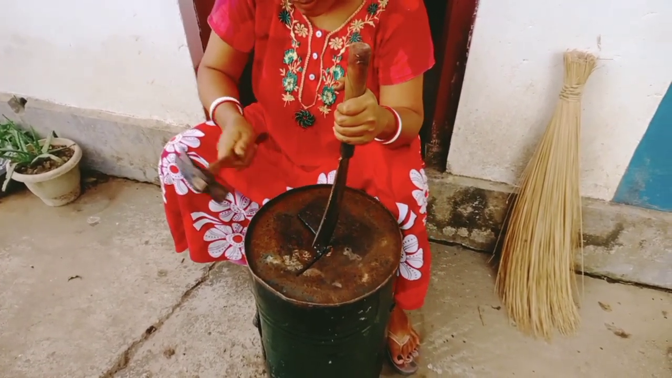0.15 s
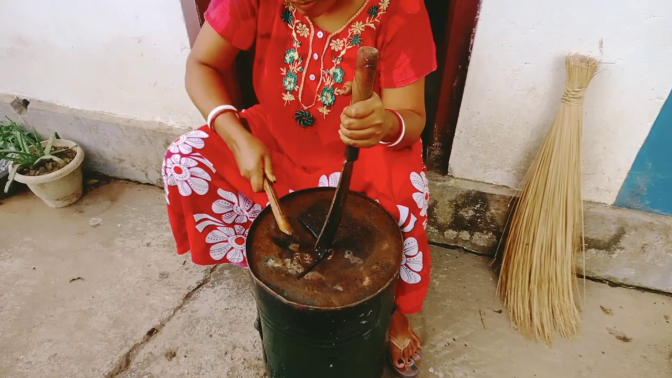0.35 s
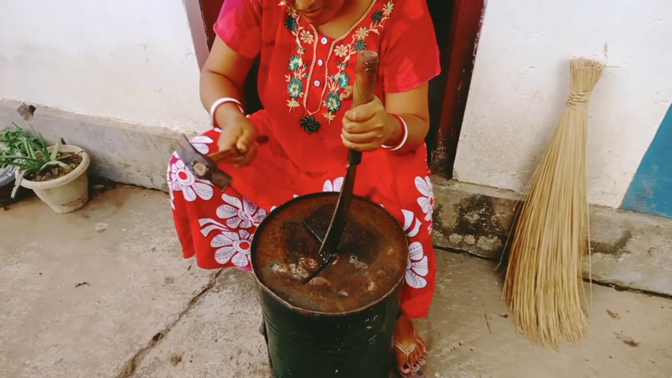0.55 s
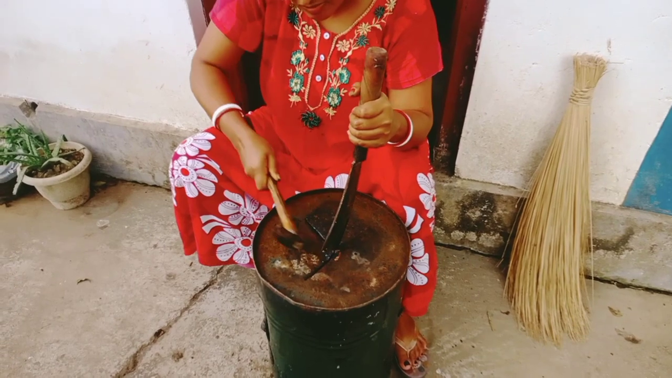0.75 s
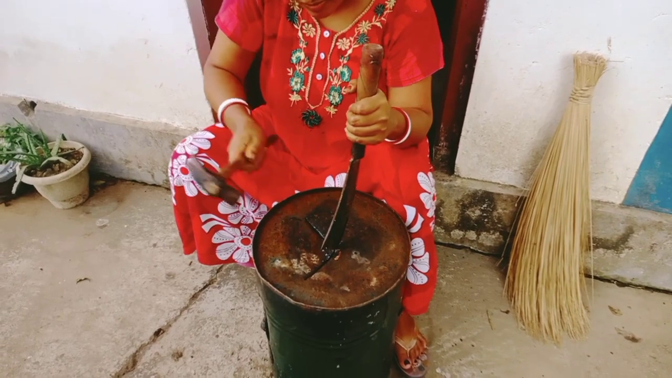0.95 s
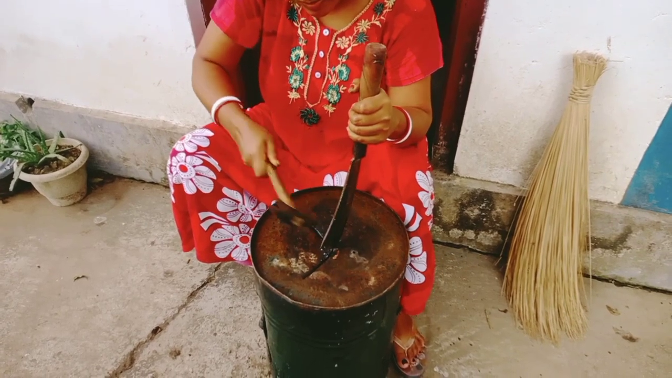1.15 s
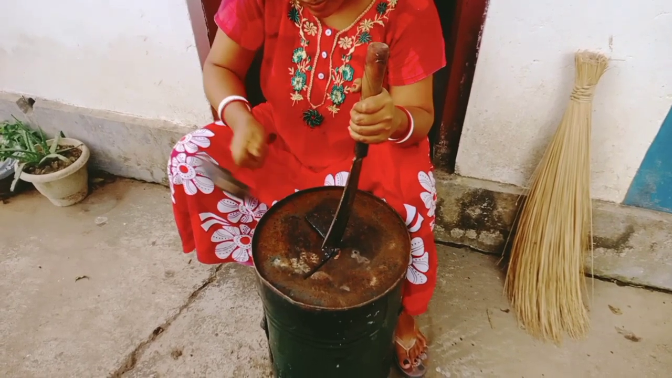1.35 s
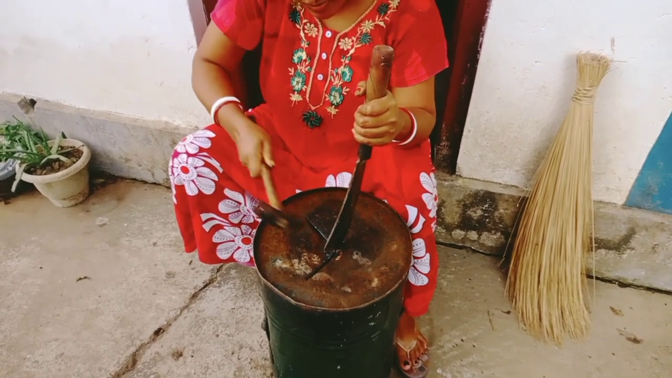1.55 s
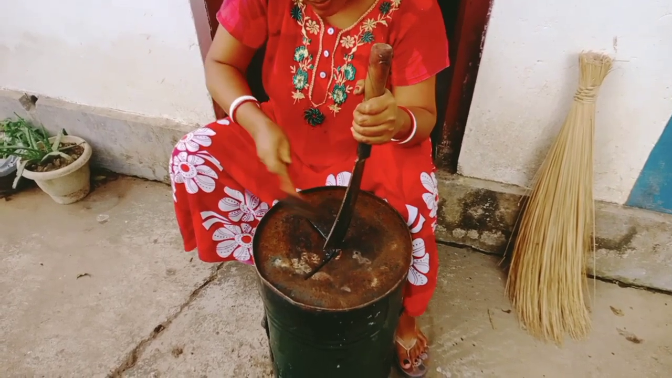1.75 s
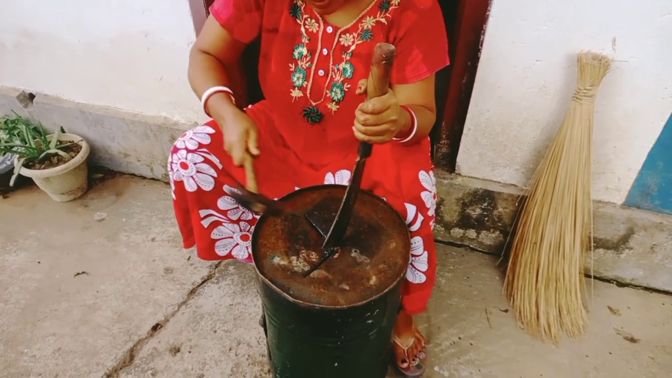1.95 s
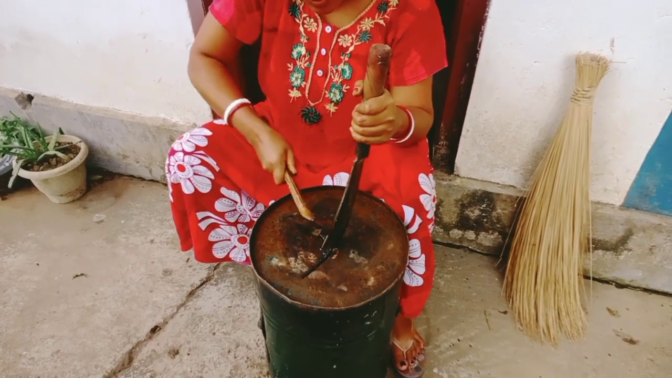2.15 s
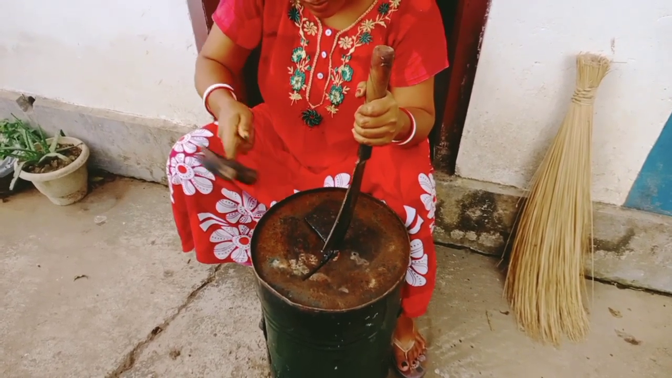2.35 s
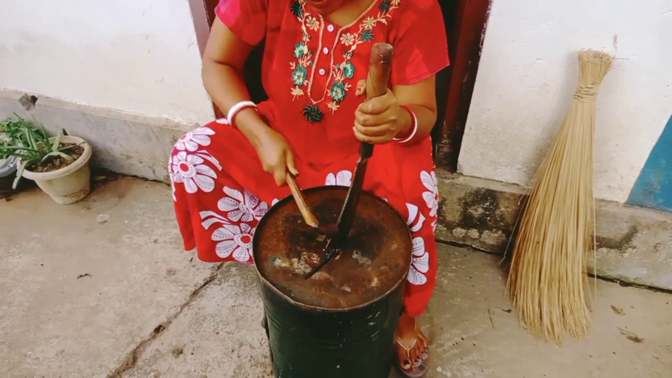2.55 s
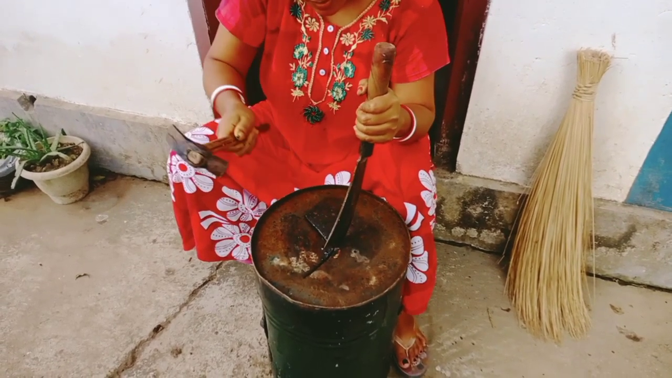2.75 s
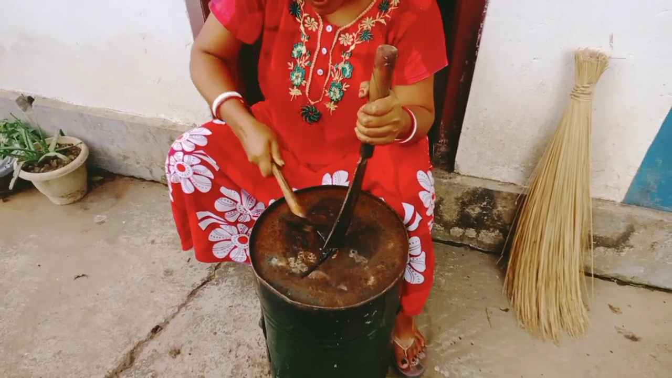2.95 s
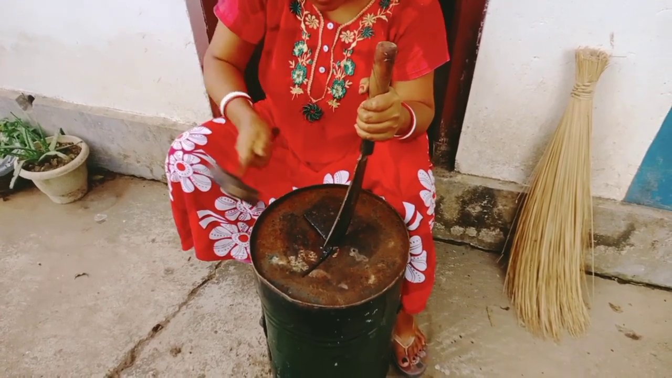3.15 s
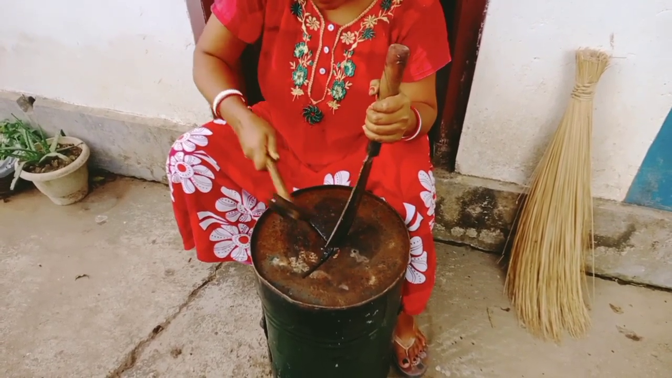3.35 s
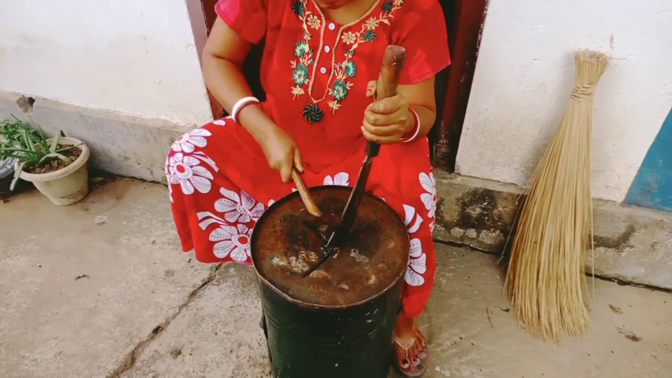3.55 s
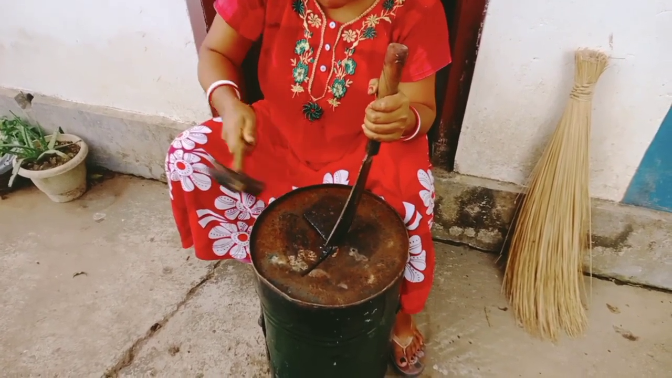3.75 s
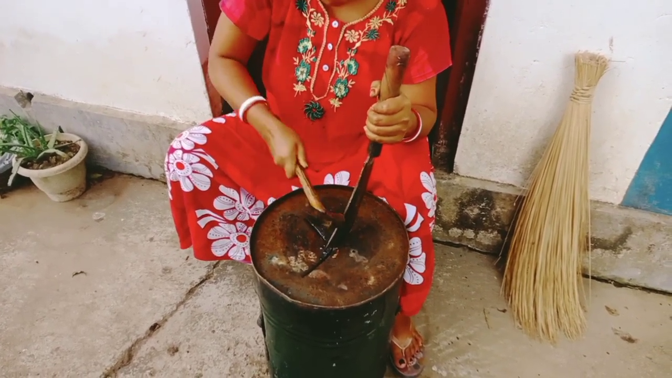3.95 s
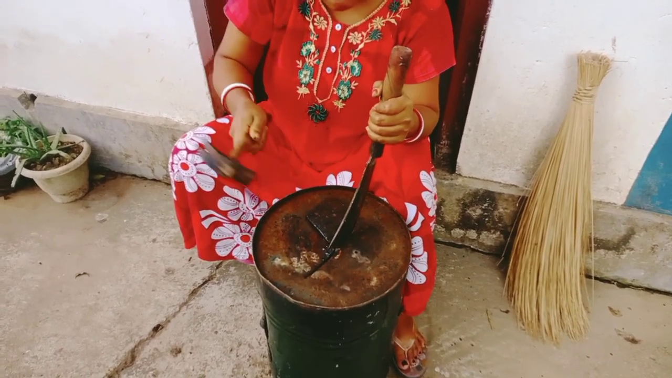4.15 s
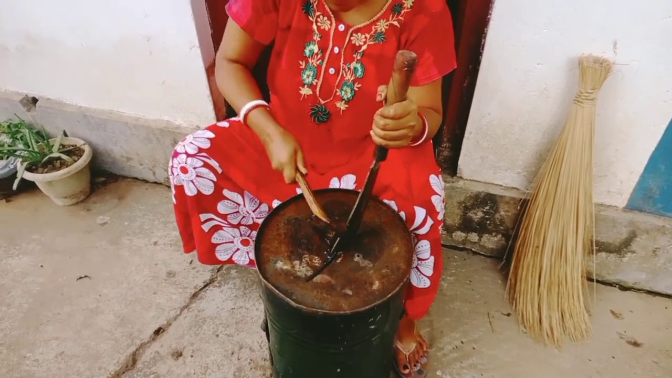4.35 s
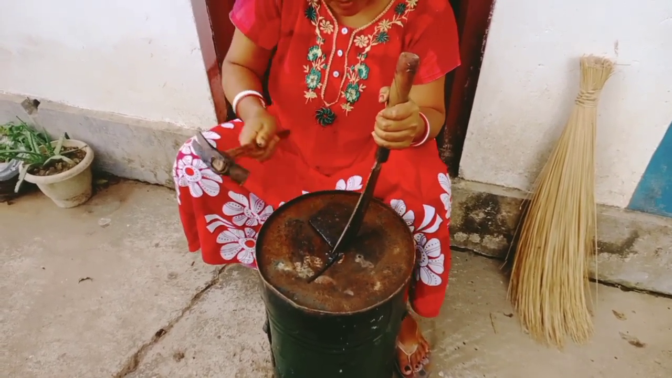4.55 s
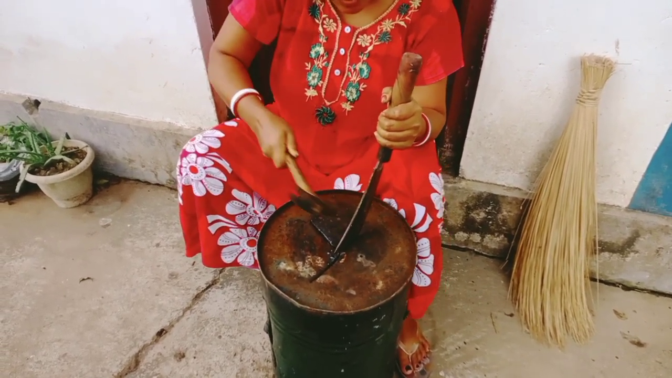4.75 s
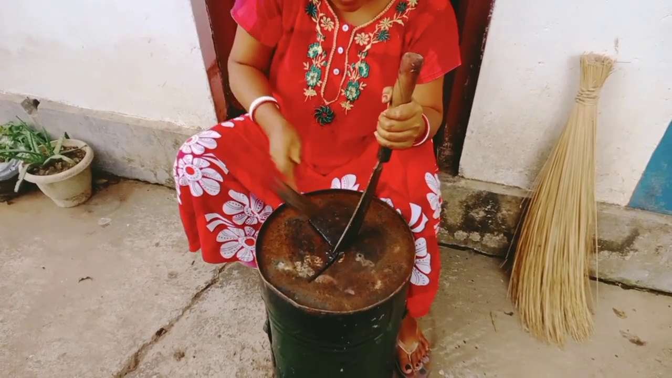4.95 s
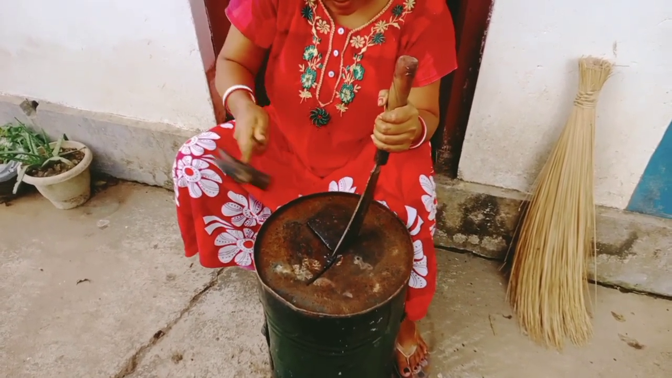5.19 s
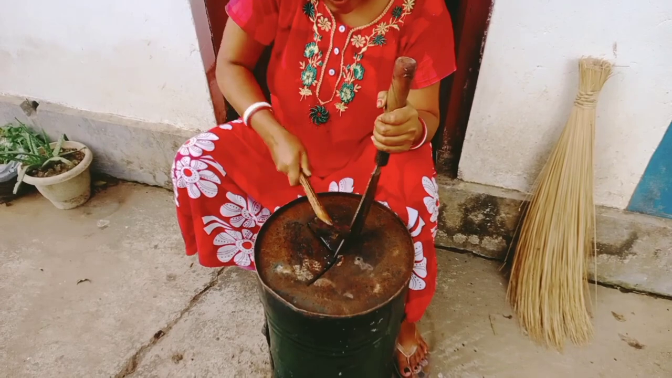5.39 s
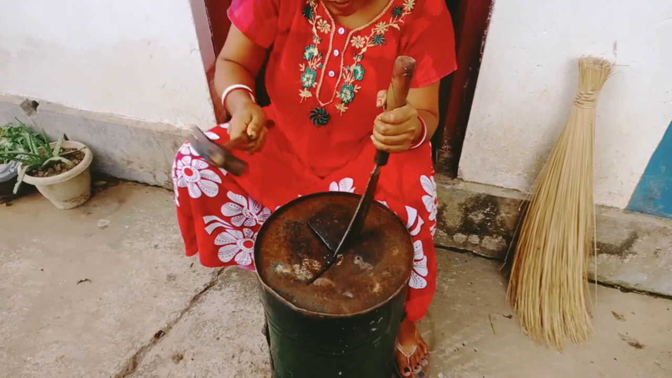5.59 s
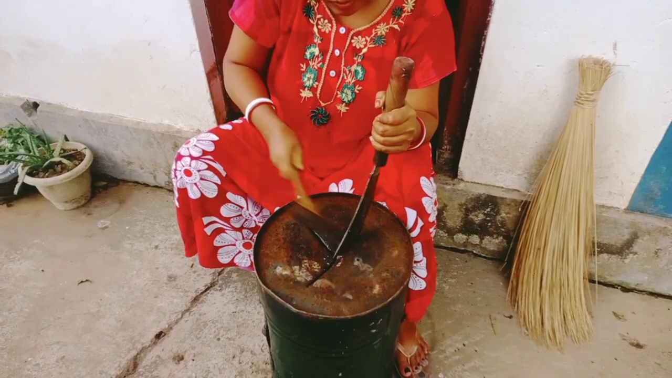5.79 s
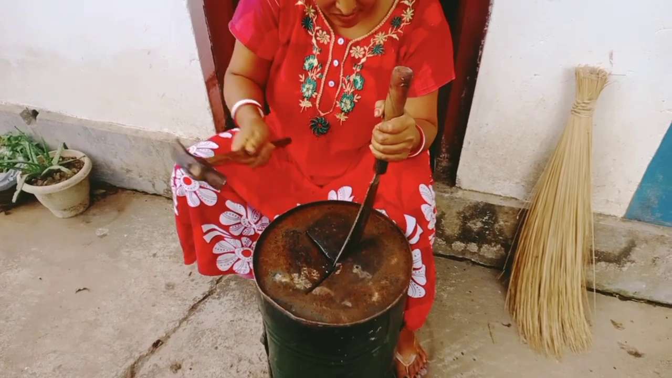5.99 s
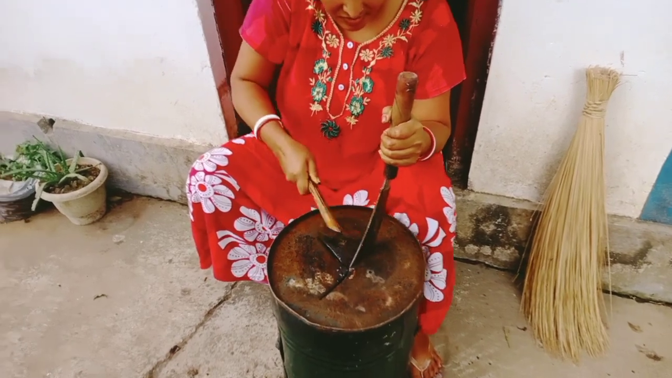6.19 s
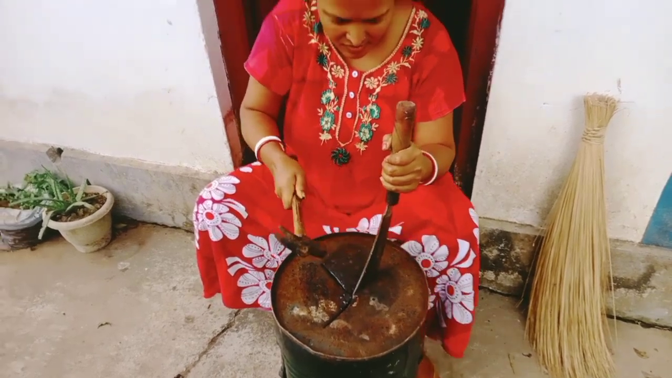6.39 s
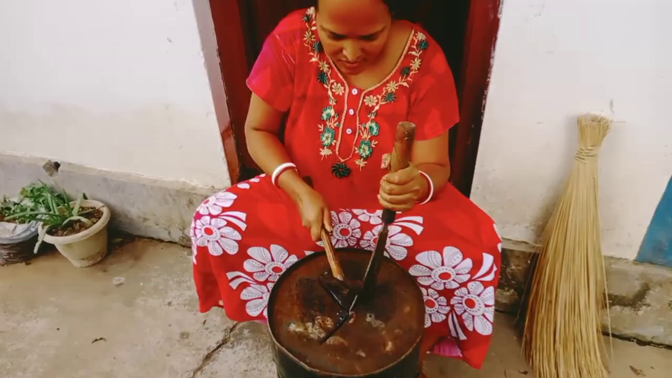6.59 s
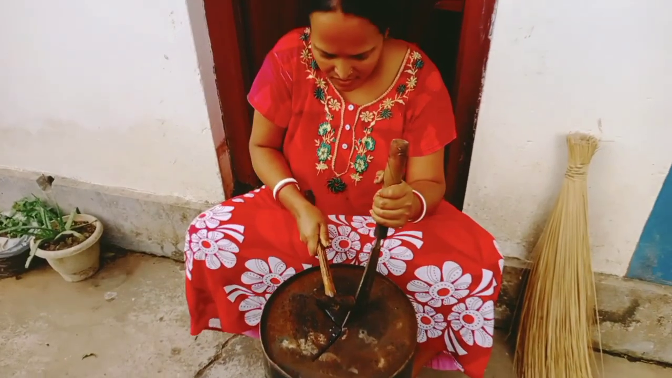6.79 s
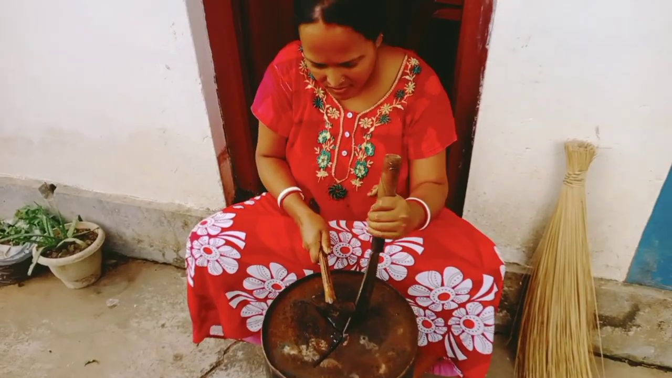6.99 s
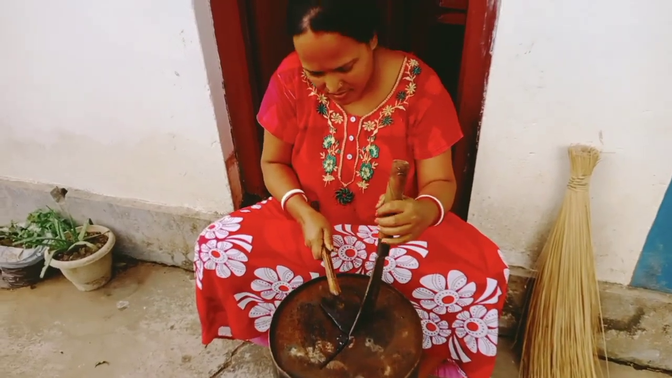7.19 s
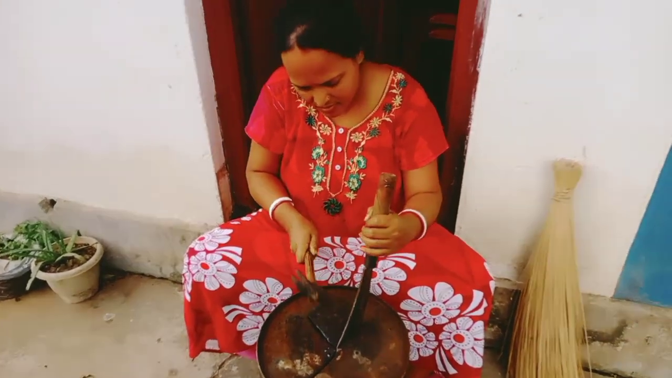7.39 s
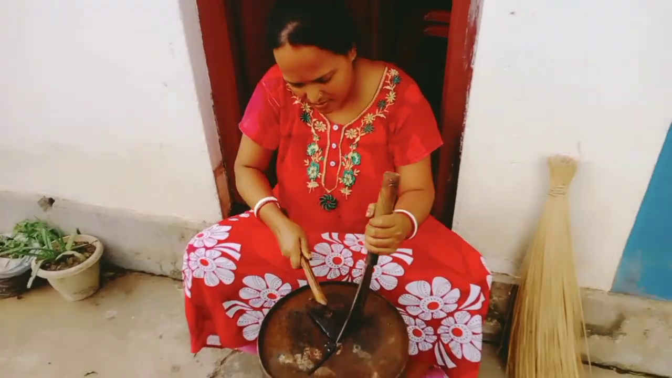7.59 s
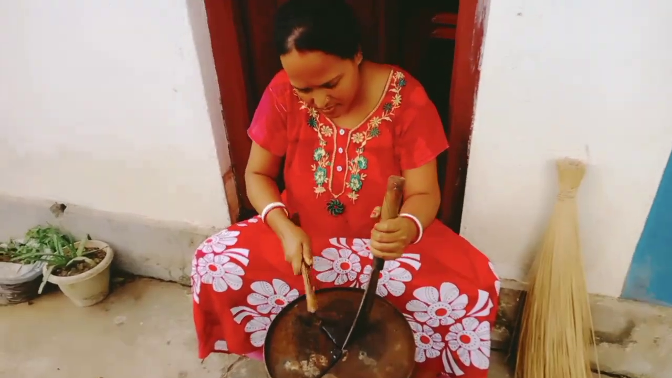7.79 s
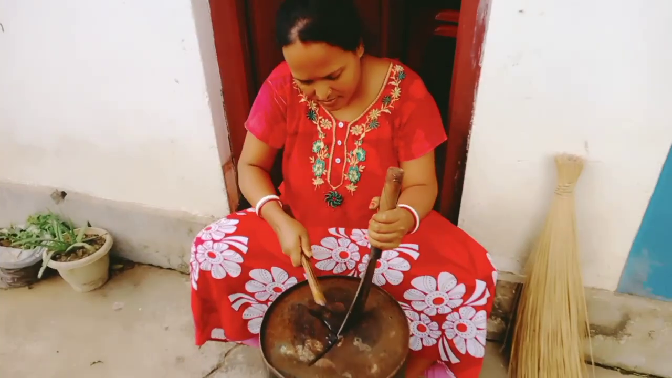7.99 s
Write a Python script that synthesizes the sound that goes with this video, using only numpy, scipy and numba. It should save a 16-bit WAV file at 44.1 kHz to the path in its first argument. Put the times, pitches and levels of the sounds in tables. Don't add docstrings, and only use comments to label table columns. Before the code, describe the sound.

Steady hammering of steel on steel, heard from a phone a couple of metres away in a yard. Every blow is a hard crack, then a rough, rattly clang of thin sheet and a hollow drum note, gone in a third of a second. Quiet bird chirps and low vehicle rumble sit behind, ducked by the blows. Near the end come light knocks and a few softer, duller strikes.

```python
import sys
import numpy as np
from scipy import signal
from scipy.fft import rfft, irfft
from scipy.io import wavfile
from scipy.ndimage import uniform_filter1d, minimum_filter1d, map_coordinates
from numba import njit

SR = 44100
rng = np.random.default_rng(int(sys.argv[2]) if len(sys.argv) > 2 else 0)


def store_wav(level_fs):
    pcm = np.round(np.clip(np.atleast_2d(level_fs), -1, 1) * 32767)
    wavfile.write(sys.argv[1], SR, pcm.T.astype(np.int16))


def invert_db(level):
    return 10 ** (np.asarray(level, dtype=float) / 20)


N = 354123

BANDS_HZ = 45 * 2 ** np.arange(0, 8.6, 1 / 3)
NOISE_BANDS = {}

# (time [s], level [dB])
VEHICLE = [(0.0, -46), (0.5, -48), (1.25, -49.5), (1.85, -55), (2.4, -45.5), (3.7, -51.5), (4.4, -45),
           (5.3, -53), (5.6, -56), (6.55, -72.5), (7.2, -87), (7.5, -69), (8.03, -58)]
# (frequency [Hz], level [dB per Hz])
RUMBLE = [(53, -37), (90, -12), (172, 2), (203, -0.5), (383, -9), (650, -12), (1500, -17), (1950, -46),
          (3300, -120)]
# (frequency [Hz], level [dB per Hz])
HISS = [(180, -59), (300, -15.5), (535, -13), (681, -11), (738, -8), (2280, 7), (4840, -8), (8780, -25),
        (10700, -46), (14000, -37)]
ENGINE_DB, TYRES_DB, DISTANT_DB = -6, -2.14, -57
LIFT_OFF_S, LIFT_OFF_DB = 1.15, -8

# (start [s], length [s], first pitch [Hz], last pitch [Hz], level [dB])
BIRD = [(0.003, 0.24, 3080, 2970, -57), (0.137, 0.11, 2884, 2470, -44), (0.515, 0.043, 4150, 4070, -55),
        (0.565, 0.032, 2606, 2450, -41), (0.603, 0.031, 2460, 2400, -54), (0.77, 0.045, 2600, 2500, -42),
        (0.921, 0.06, 4130, 4100, -56), (0.971, 0.036, 2780, 2400, -41), (1.189, 0.037, 2640, 2400, -44.5),
        (1.352, 0.1, 4060, 4040, -61), (1.397, 0.032, 2630, 2460, -39.5), (1.619, 0.045, 2670, 2380, -48)]

# (time [s], knock level [dB], boom level [dB])
TOUCHES = [
    (6.885, -70, -39),
    (6.93, -75, -43.5),
    (6.981, -40, -49),
    (7.004, -44, -44),
    (7.03, -50, -54),
    (7.1, -72, -56),
    (7.169, -61, -65),
    (7.64, -59, -36),
    (7.68, -65, -63),
]
# (frequency [Hz], level [dB per Hz])
KNOCK = [(35, -52), (60, -23), (182, 3.5), (329, -22), (375, -43), (486, 0), (1120, -9), (5000, -28),
         (6500, -73), (11000, -120)]

# (time [s], crack [dB], clang against crack [dB], edge [dB], square [dB]).
BLOWS = [(0.271, -8, -1.5, 1, 1.5), (0.686, -1, -10.5, 5.5, 6.5), (1.062, -1.5, -9.5, 4.5, -3),
         (1.441, -4, -10, 4.5, -3.5), (1.808, -4.5, -9, 6.5, -4.5), (2.162, -2.5, -9, 5.5, -5),
         (2.53, 2, -11.5, 2.5, 5), (2.89, -1, -9, 1, 3), (3.242, -2.5, -8, 6, -0.5),
         (3.584, -10, -3.5, 5.5, 2), (3.946, -9, -2.5, 1, -4), (4.289, 2, -12.5, 6, 2),
         (4.647, -1, -8.5, 4.5, 1), (5.017, -9, -5, 5, 5.5), (5.369, -14.5, -1, 4.5, 4),
         (5.741, -6.5, -9.5, 6.5, 2.2), (6.109, -10, -7, 5.5, 1), (6.588, -26.5, 3.5, 2.5, 4),
         (7.445, -15, -3, 7, 4), (7.765, -19, -3, 8, 3.5)]
# (frequency [Hz], level [dB per Hz])
CRACK = [(35, -31), (60, -7.5), (323, 9), (749, 2.5), (2350, 3.5), (5720, -9.5), (6280, -23), (7400, -32.5),
         (10500, -32.5), (14600, -30), (16000, -49)]
CONTACT_MS, CONTACT_MS_PER_DB, CONTACT_MS_PER_SQUARE_DB = 5.43, 0.02, 0.53
# (frequency [Hz], level [dB per Hz])
CLANG = [(24, -76), (40, -55), (101, -6), (133, -1.5), (276, 4), (444, -4.5), (479, -2.5), (810, -7),
         (896, -3), (990, -6.5), (1590, -3.5), (4600, -19), (5800, -25), (7540, -38.5), (14500, -46),
         (16000, -52)]
# (frequency [Hz], time [s])
CLANG_T60 = [(60, 0.37), (160, 0.47), (420, 0.35), (1100, 0.28), (2900, 0.38), (7600, 0.26), (15000, 0.249)]
SHEET_LINES_DB = 5.5

# (frequency [Hz], waver [Hz], 60 dB decay [s])
BOOM = [(113, 2, .42), (176, 6, .33), (214, 5, .4), (283, 7, .28), (350, 7, .28)]
# (frequency [Hz], waver [Hz], 60 dB decay [s])
CHIME = [(750, 3, .24), (922, 2, .3), (1174, 3, .34), (1552, 3, .27)]
# (frequency [Hz], waver [Hz], 60 dB decay [s])
NOTE = [(484, 4, .14), (488, 5, .4)]
# (frequency [Hz], level [dB], 60 dB decay [s])
LID = [(619, -15, .34), (645, -18, .35), (872, -13, .38), (1330, -16, .3), (1637, -14, .23),
       (1717, -15, .25), (1795, -11, .27), (1960, -11, .33), (2089, -16, .3), (2178, -13, .3),
       (2330, -16, .33), (2444, -17, .2), (2560, -19, .35), (2830, -16, .33), (3155, -19, .3),
       (3480, -20, .26), (3693, -20, .3), (4235, -24, .28)]
# (frequency [Hz], width [Hz], 60 dB decay [s])
STEEL = [(5480, 180, .24), (6225, 110, .13), (6600, 260, .28), (8620, 250, .22), (10000, 220, .28),
         (11000, 300, .22), (13050, 500, .2), (14370, 400, .2)]

# (level [dB], change with square or edge [dB per dB], change as the cut grows [dB per s])
THUMP_LAW = [(-21, 1.07, -0.48)]
NOTE_LAW = [(-3.8, 1.2, 2.7), (-9.5, 1.3, 0.53)]
BOOM_LAW = [(-19, -0.45, -0.69), (-20.5, 0.05, 0.3), (-21, 0.33, -0.18), (-22, 0.05, 0.66),
            (-22, -0.1, 0.17)]
CHIME_LAW = [(-39, 0.3, 3), (-17.5, 0.84, -1.5), (-23, 0.61, -1), (-19, -0.2, -9.5)]
STEEL_LAW = [(-67, 0.6, 2.2), (-31.5, 2.7, -0.3), (-29, 0.82, -1.2), (-53, 0.4, 0.6), (-64, 0.4, 2.1),
             (-50, 0.3, 0.099), (-55, -0.4, 0.19), (-36.5, -0.6, 0.3)]
BOOM_SCATTER_DB, CHIME_SCATTER_DB, STEEL_SCATTER_DB, LESSER_SCATTER_DB = 1.5, 2, 2.5, 3
LESSER_FADE_DB_PER_S = -0.55
# (time [s], level [dB])
PINNED = [
    (3.5, -4),
    (4.65, -11),
    (5.4, -9.5),
    (6.1, -5.5),
]

# (time [s], frequency [Hz], level [dB], 60 dB decay [s])
LID_SWEET_SPOTS = [(0.273, 97.4, -16.5, 0.091), (0.686, 753, -17.5, 0.29), (0.686, 1967, -21, .3),
                   (1.06, 1552, -14, 0.26), (2.162, 647, -21, 0.38), (2.531, 1960, -23, 0.4),
                   (2.89, 1564, -13.5, .27), (3.242, 770, -21, 0.24), (3.242, 1955, -22, 0.4),
                   (4.647, 1165, -22, 0.35), (7.765, 2356, -29, 0.28)]
# (time [s], frequency [Hz], level [dB], 60 dB decay [s])
STEEL_SWEET_SPOTS = [(0.271, 14370, -43, .2), (2.532, 14370, -53.5, 0.23), (3.946, 13200, -44, 0.22),
                     (4.288, 8700, -42, 0.27), (4.288, 5620, -35, 0.44), (4.647, 8620, -44, 0.23),
                     (4.647, 5600, -29.5, 0.31), (5.741, 10000, -55, 0.38), (6.109, 5510, -30, 0.21),
                     (6.109, 10000, -57, .28), (6.588, 10070, -53, 0.18), (7.446, 14300, -53, .22),
                     (7.765, 14400, -62, .2)]

TURN_AWAY_S, TURN_AWAY_DB, TURN_AWAY_HZ = 7.0, -7.5, 8000
MIC_TOP_HZ, LOOK_AHEAD_S = 15400, 0.03


def unit(x):
    return x / np.sqrt(np.mean(x ** 2))


def on_bands(table):
    hz, value = np.transpose(table)
    return np.interp(np.log(BANDS_HZ), np.log(hz), value)


def band_noise(shift_s, lines_db=0):
    if lines_db not in NOISE_BANDS:
        place = np.log(np.fft.rfftfreq(N, 1 / SR) + 300) / .007
        heights = np.clip(rng.standard_normal(1600), -2, 1.5)
        comb = invert_db(lines_db * map_coordinates(heights, [place], order=1))
        source = unit(irfft(rfft(rng.standard_normal(N)) * comb, N))
        edges = np.clip(BANDS_HZ[:, None] * 2 ** np.array([-1 / 6, 1 / 6]), 1, SR / 2.1)
        filters = [signal.butter(2, e, "band", fs=SR, output="sos") for e in edges]
        NOISE_BANDS[lines_db] = [signal.sosfilt(f, source) for f in filters]
    shift = int(shift_s * SR)
    return np.array([np.roll(band, shift + 9001 * k) for k, band in enumerate(NOISE_BANDS[lines_db])])


def coloured(table):
    return unit(invert_db(on_bands(table)) @ band_noise(rng.uniform(0, N / SR)))


def walk(rate):
    k = int(SR / min(rate, 400))
    levels = rng.standard_normal(N // 100)[:N // k + 1]
    held = np.repeat(levels, k)
    return unit(uniform_filter1d(uniform_filter1d(held, k), k)[:N])


def strikes(times, gains):
    x = np.zeros(N)
    x[(np.asarray(times) * SR).astype(int)] = gains
    return x


def fade(x, t60, hz=0., rise=0.):
    turn = np.exp(2j * np.pi * hz / SR) if hz else 1.
    y = signal.lfilter([1], [1, -turn * np.exp(-np.log(1000) / (t60 * SR))], x)
    keep = np.exp(-1 / (max(rise, 1e-5) * SR))
    return signal.lfilter([1 - keep], [1, -keep * turn], y)


def burst(times, db, colour, t60, rise, scatter_db, treble_db=0., hold_ms=None, lines_db=0):
    gains = invert_db(on_bands(colour))
    gains = gains / np.sqrt(np.sum(gains ** 2 * BANDS_HZ) / np.sum(BANDS_HZ))
    treble = np.clip(np.log2(BANDS_HZ / 1500) / 2, 0, 1)
    luck = scatter_db * rng.standard_normal((len(times), len(BANDS_HZ)))
    mix = invert_db(db[:, None] + np.outer(treble_db, treble) + luck)
    noise = band_noise(rng.uniform(0, N / SR), lines_db)
    out = np.zeros(N)
    for gain, band, sizes, band_t60 in zip(gains, noise, mix.T, t60):
        out += gain * band * fade(strikes(times, sizes), band_t60, rise=rise)
    if hold_ms is not None:
        for s, ms in zip(times, hold_ms):
            rest = out[int((s + ms / 1000) * SR):int((s + .2) * SR)]
            rest *= np.exp(-np.arange(len(rest)) / SR / .0018)
    return out


def ring(times, db, modes, rise, flutter_db):
    out = 0
    for (hz, waver_hz, t60), size in zip(modes, invert_db(db).T):
        tone = np.sin(2 * np.pi * np.cumsum(hz + waver_hz * walk(30)) / SR)
        flutter = invert_db(flutter_db * walk(35))
        out = out + flutter * tone * fade(strikes(times, size), t60, rise=rise)
    return out


def clusters(times, db, modes):
    out = 0
    for (hz, width_hz, t60), size in zip(modes, invert_db(db).T):
        b, a = signal.iirpeak(hz, hz / width_hz, fs=SR)
        hiss = unit(signal.lfilter(b, a, signal.lfilter(b, a, rng.standard_normal(N))))
        out = out + hiss * fade(strikes(times, size), t60, rise=0.00078)
    return out


def wake(law, s, against_db, aim_db, scatter_db=0):
    base, per_aim, per_s = np.transpose(law)
    luck = scatter_db * rng.standard_normal((len(s), len(base)))
    return against_db[:, None] + base + np.outer(aim_db, per_aim) + np.outer(s, per_s) + luck


def yard():
    t = np.arange(N) / SR
    vehicle_db = np.interp(t, *np.transpose(VEHICLE))
    hum_db = vehicle_db + ENGINE_DB + LIFT_OFF_DB * np.clip((t - LIFT_OFF_S) / 0.2, 0, 1)
    throb = coloured([(45, -33), (68, -3.0), (80, 15.5), (110, -8.5), (200, -52.5)])
    hum = invert_db(hum_db) * unit(throb + 0.78 * np.sin(2 * np.pi * 72 * t))
    rumble = invert_db(vehicle_db + 0.38 * walk(19)) * coloured(RUMBLE)
    hiss_size = np.hypot(invert_db(vehicle_db + TYRES_DB), invert_db(DISTANT_DB))
    gusts = invert_db(0.92 * walk(3.5) + 1.5 * walk(15))
    return hum + rumble + hiss_size * gusts * coloured(HISS)


def bird():
    out, jitter_hz = np.zeros(N), 28 * walk(300)
    for s, length, hz0, hz1, db in BIRD:
        start, count = int(s * SR), int(length * SR)
        u = np.arange(count) / count
        hz = hz1 + (hz0 - hz1) * (1 - u) ** 1.6 + jitter_hz[start:][:count]
        swell = invert_db(db + 8.5) * np.sin(np.pi * u ** 0.69)
        out[start:][:count] += swell * np.sin(2 * np.pi * np.cumsum(hz) / SR)
    out = out * invert_db(2.0 * walk(150))
    echo = rng.standard_normal(4000) * np.exp(-np.arange(4000) / SR / .025)
    return out + invert_db(-33.5) * signal.fftconvolve(out, echo)[:N]


def touches():
    s, knock, boom = np.transpose(TOUCHES)
    knocks = burst(s, knock - 1.5, KNOCK, np.full(len(BANDS_HZ), .1), rise=0.00066, scatter_db=2.5)
    murmur_db = boom[:, None] + [-16, -10, -22.0, -22, -34.5]
    return knocks + ring(s, murmur_db, BOOM, rise=0.003, flutter_db=6.0)


def sweet_spots():
    waver = invert_db(1.5 * walk(35))
    lid = sum(fade(strikes([s], invert_db(db)), t60, hz, rise=0.006).imag for s, hz, db, t60 in LID_SWEET_SPOTS)
    steel = 0
    for s, hz, db, t60 in STEEL_SWEET_SPOTS:
        steel = steel + clusters([s], np.array([[db]]), [(hz, 0.025 * hz, t60)])
    return waver * lid + steel


def contact_crack(s, crack, square):
    hold = CONTACT_MS + CONTACT_MS_PER_DB * crack + CONTACT_MS_PER_SQUARE_DB * square
    return burst(s, crack + 11, CRACK, np.full(len(BANDS_HZ), .08), rise=.0007, scatter_db=1.5,
                 hold_ms=np.clip(hold, 2, 6.5))


def lesser_modes(s, sheet):
    luck = LESSER_SCATTER_DB * rng.standard_normal((len(s), len(LID)))
    db = (sheet - 13 - LESSER_FADE_DB_PER_S * s)[:, None] + np.array(LID)[:, 1] + luck
    modes = [(hz, 0.00272 * hz, t60) for hz, _, t60 in LID]
    return ring(s, db, modes, rise=0.0046, flutter_db=7.0)


def drum():
    s, crack, clang, edge, square = np.transpose(BLOWS)
    sheet = crack + clang
    out = contact_crack(s, crack, square)
    out += burst(s, sheet - 0.5, CLANG, on_bands(CLANG_T60), rise=0.00053, scatter_db=1.5,
                 treble_db=edge, lines_db=SHEET_LINES_DB)
    thump = invert_db(wake(THUMP_LAW, s, crack, square)[:, 0] + 19.5)
    out += fade(strikes(s, thump), 0.03, 95.4, rise=0.0025).imag
    boom = wake(BOOM_LAW, s, sheet, square, BOOM_SCATTER_DB)
    boom[:, 0] += np.interp(s, *np.transpose(PINNED))
    out += ring(s, boom + 10.8, BOOM, rise=0.012, flutter_db=3.5)
    chime = wake(CHIME_LAW, s, sheet, square, CHIME_SCATTER_DB)
    out += ring(s, chime + 10, CHIME, rise=0.0063, flutter_db=4)
    out += clusters(s, wake(STEEL_LAW, s, sheet, edge, STEEL_SCATTER_DB) + 6.5, STEEL)
    out += ring(s, wake(NOTE_LAW, s, sheet, square) - 7, NOTE, rise=0.0026, flutter_db=0.5)
    return out + lesser_modes(s, sheet)


def scene():
    near = drum()
    dull = signal.sosfiltfilt(signal.butter(4, TURN_AWAY_HZ, fs=SR, output="sos"), near)
    top = invert_db(TURN_AWAY_DB * np.clip((np.arange(N) / SR - TURN_AWAY_S) / 0.6, 0, 1))
    return (dull + top * (near - dull) + touches() + bird() + yard() + sweet_spots())[None]


@njit
def release(gain, step):
    out, g = np.empty(len(gain)), 1.
    for i in range(len(gain)):
        g = min(gain[i], g + (1 - g) * step)
        out[i] = g
    return out


def band_limit(x):
    return signal.sosfilt(signal.butter(12, 16760, fs=SR, output="sos"), x)


def record(dry):
    dry = signal.sosfilt(signal.ellip(8, .2, 60, MIC_TOP_HZ, fs=SR, output="sos"), dry)
    dry = signal.sosfilt(signal.butter(3, 44, "high", fs=SR, output="sos"), dry)
    wanted = np.minimum(1, invert_db(-6.0) / (np.abs(dry[0]) + 1e-9)) ** 0.68
    ahead = int(LOOK_AHEAD_S * SR)
    early = minimum_filter1d(wanted, size=ahead, origin=-(ahead // 2))
    gain = uniform_filter1d(release(early, 1 / (.06 * SR)), size=64)
    x = invert_db(2.5) * dry * gain
    ceiling = .95
    clipped = ceiling * x / (ceiling ** 6 + x ** 6) ** (1 / 6)
    return band_limit(clipped)


dry = scene()
out = record(dry)
store_wav(out)
```